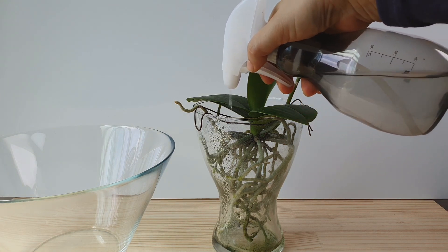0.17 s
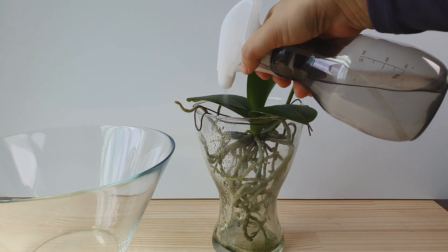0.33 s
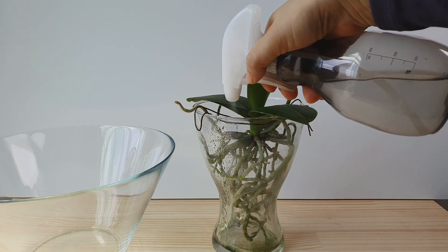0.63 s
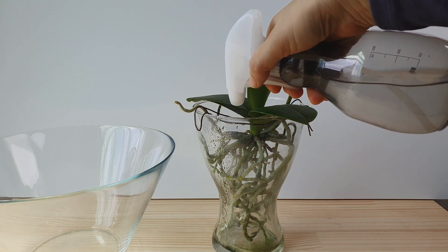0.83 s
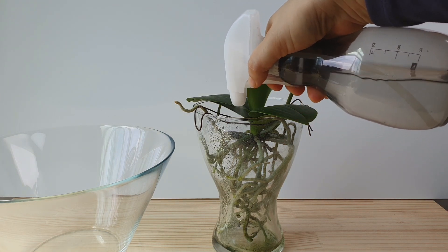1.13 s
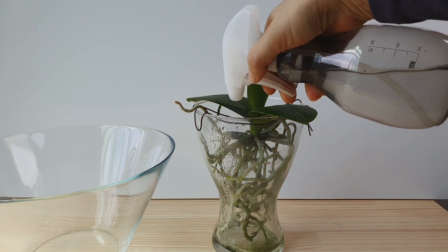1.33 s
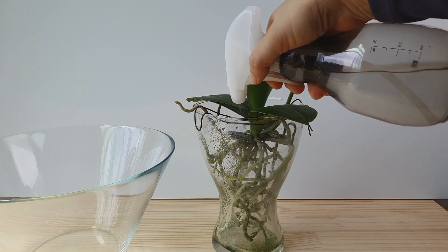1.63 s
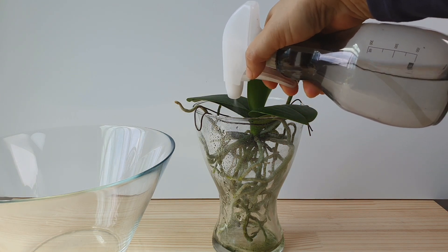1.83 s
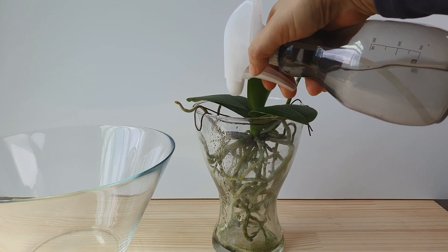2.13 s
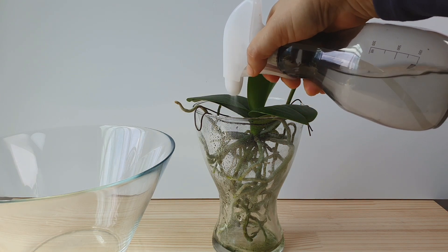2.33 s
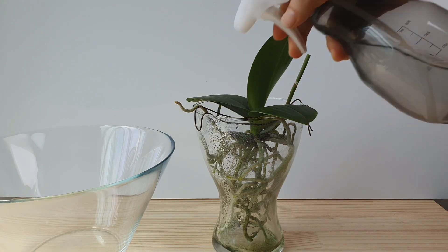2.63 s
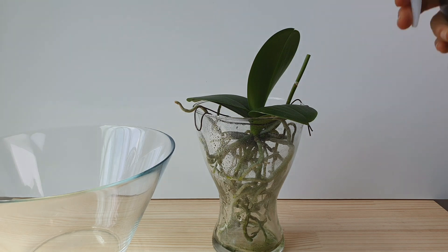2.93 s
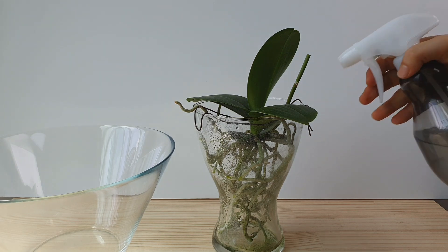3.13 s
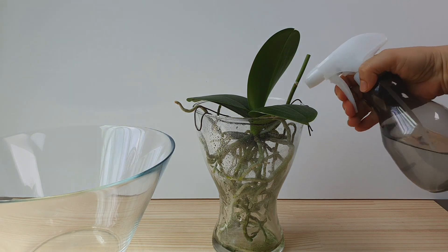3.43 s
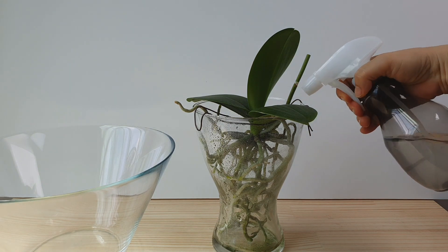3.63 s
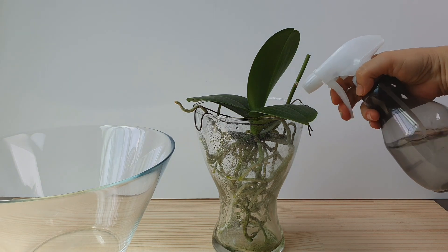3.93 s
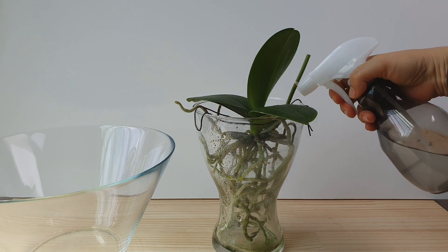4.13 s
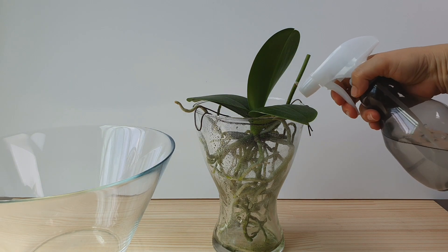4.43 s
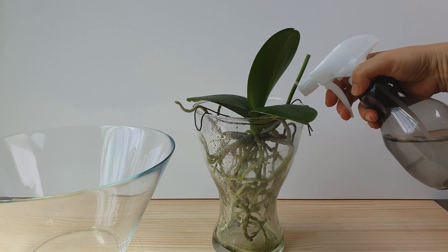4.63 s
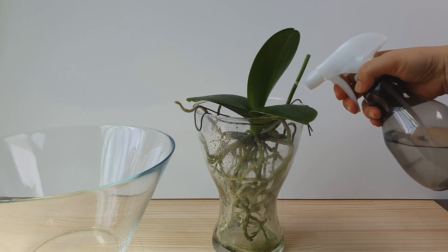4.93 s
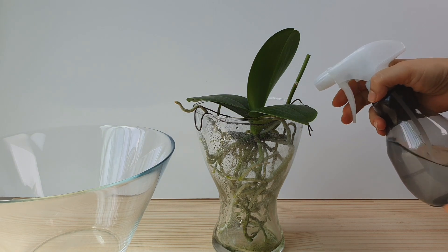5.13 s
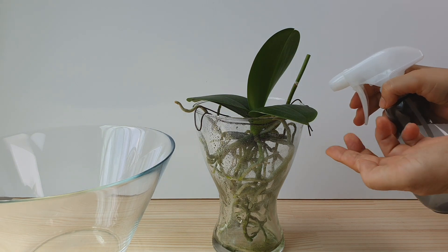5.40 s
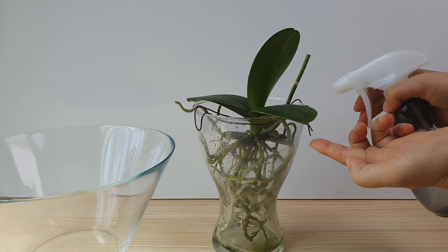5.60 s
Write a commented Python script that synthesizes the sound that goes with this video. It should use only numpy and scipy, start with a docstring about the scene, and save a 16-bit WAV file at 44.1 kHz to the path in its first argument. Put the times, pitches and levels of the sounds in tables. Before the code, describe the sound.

A plastic trigger spray bottle mists a plant in five short, hissing squirts, with small creaks and ticks in a quiet room.

```python
"""A plastic trigger bottle mists a potted plant in a small, bare room, close to a mono microphone.
A low hum lies underneath from the start, and first the trigger creaks back from an earlier squeeze.
Five strokes follow. In each, the trigger creaks as it is squeezed, then the nozzle hisses and the
mist patters on the leaves. Next the spring pushes the trigger back with another creak while the pump
gulps water. Most strokes end with a small tick as the trigger reaches its stop."""
import sys
import numpy as np
from scipy import signal
from scipy.fft import rfft, irfft
from scipy.io import wavfile

SR = 44100
rng = np.random.default_rng(int(sys.argv[2]) if len(sys.argv) > 2 else 0)


def waveform_to_disk(signal):
    """Save audio, clipped to [-1, 1], as 16-bit WAV at the path in sys.argv[1]."""
    frames = np.transpose(np.atleast_2d(signal))
    scaled = np.clip(frames, -1, 1) * 32767
    samples = np.round(scaled).astype(np.int16)
    wavfile.write(sys.argv[1], SR, samples)


N = 254100
TIME = np.arange(N) / SR


def from_db(db):
    """Turn decibels into a gain to multiply by."""
    return 10 ** (np.asarray(db) / 20)


def rms_one(x):
    """Scale a signal so that its average strength (rms) is 1."""
    return x / np.sqrt(np.mean(x ** 2) + 1e-20)


def at_hz(points, hz, column=1):
    """Read a table between its rows, with every octave equally wide."""
    table = np.array(points)
    return np.interp(np.log(np.maximum(hz, 1)), np.log(table[:, 0]), table[:, column])


def drift(rate_hz):
    """A random wobble of size 1, mostly slower than rate_hz."""
    hz = np.arange(N // 2 + 1) * SR / N
    noise_spectrum = rfft(rng.standard_normal(N))
    return rms_one(irfft(noise_spectrum / (1 + (hz / rate_hz) ** 2) ** 2, N))


def colour(x, tone, size=8192):
    """Give x a tone colour. The table sets only the balance of low and high, not the loudness."""
    hz = np.arange(size // 2 + 1) * SR / size
    cepstrum = irfft(np.log(from_db(at_hz(tone, hz))))
    # Folding the cepstrum makes the filter ring after a click, never before it.
    cepstrum[1:size // 2] *= 2
    cepstrum[size // 2 + 1:] = 0
    response = irfft(np.exp(rfft(cepstrum)))
    return signal.fftconvolve(x, response / np.linalg.norm(response))[:N]


def resonate(x, hz, width_hz):
    """Make x ring at one pitch; a narrower width rings longer."""
    decay = np.exp(-np.pi * width_hz / SR)
    return signal.lfilter([1, 0, -1], [1, -2 * decay * np.cos(2 * np.pi * hz / SR), decay * decay], x)


def droplets(per_s, spread_db):
    """Tiny impacts of uneven size at random moments."""
    sizes = from_db(spread_db * np.minimum(rng.exponential(1, N), 4))
    signs = rng.choice([-1, 1], N)
    hits = rng.random(N) < per_s / SR
    return rms_one(sizes * signs * hits)


# The slow rise and fall of the hum. Each row: time in seconds, level in dB.
HUM_LEVELS = [(0, -57), (.5, -57.5), (1.2, -63), (2.05, -57), (3.05, -55), (3.65, -61.5), (4.1, -64),
              (4.7, -55), (5.76, -56.5)]

def hum(pitch_hz=58.8, swell_db=3.5, waver_db=0.14, waver_rad=0.12):
    """A low, wavering tone that swells a little at the top of a spray."""
    times, levels = np.transpose(HUM_LEVELS)
    _, mist, _ = spray_gains()
    db = np.interp(TIME, times, levels) + swell_db * mist / mist.max() + waver_db * drift(12.6)
    phase = 2 * np.pi * pitch_hz * TIME + waver_rad * drift(5.4)
    return from_db(db) * np.sqrt(2) * np.sin(phase)


# The tone colours of the air and the rumble. Each row: frequency in Hz, relative level in dB.
AIR_TONE = [(50, -19.5), (80, -6), (130, -4.5), (220, -8), (330, -19.5), (600, -23.5), (1500, -29),
            (3500, -32.5), (5000, -37), (8000, -45), (10300, -39.5), (15000, -42)]
RUMBLE_TONE = [(15, -5.5), (38, -1), (55, 1), (80, -13.5), (200, -38.5), (1000, -81)]
# Faint low drones of the room. Each row: pitch in Hz, width in Hz, level in dB.
ROOM_DRONES = [(101.4, 1.9, -80), (124.8, 8, -83), (217, 6.2, -84.5), (292.3, 19, -87)]

def room_noise(air_db=-74.5, rumble_db=-64.0):
    """The quiet room: soft air noise, a deep rumble and faint drones."""
    air = from_db(air_db) * colour(rng.standard_normal(N), AIR_TONE)
    rumble = from_db(rumble_db) * colour(rng.standard_normal(N), RUMBLE_TONE)
    drones = sum(from_db(db) * rms_one(resonate(rng.standard_normal(N), hz, width_hz))
                 for hz, width_hz, db in ROOM_DRONES)
    return air + rumble + drones


# How the room echoes. Each row: frequency in Hz, seconds to fade by 60 dB,
# level of the echoes over the direct sound in dB.
ROOM_ECHOES = [(304, 0.59, 11), (2456, 0.32, 10), (5900, 0.35, 4), (10000, 0.3, 3), (16500, .22, 17.5)]

def room_echo(x, build_s=0.0056, first_echo_s=0.00043):
    """Echoes thicken for a moment, then die away, the treble first; overall power is kept."""
    t = TIME[:SR * 3 // 4]
    hz = np.arange(len(t) // 2 + 1) * SR / len(t)
    noise_spectrum = rfft(rng.standard_normal(len(t)))
    edges_hz = np.append(0, np.geomspace(400, SR / 2, 14))
    build = 1 - np.exp(-np.maximum(t - first_echo_s, 0) / build_s)
    tail = 0
    for low, high in zip(edges_hz, edges_hz[1:]):
        band = irfft(noise_spectrum * (hz >= low) * (hz < high), len(t))
        fade = build * from_db(-60 * t / at_hz(ROOM_ECHOES, (low + high) / 2))
        tail = tail + band * fade / np.linalg.norm(fade)
    echo_gain = from_db(at_hz(ROOM_ECHOES, hz, column=2))
    response = irfft((1 + echo_gain * rfft(tail)) / np.sqrt(1 + echo_gain ** 2), len(t))
    return signal.fftconvolve(x, response[:len(t) * 9 // 10])[:N]


# Water refills the pump in gulps, and surges into the nozzle as some sprays start.
# Each row: start in seconds, length in seconds, level in dB.
PUMP_GULPS = [(0.113, 0.025, -60), (0.712, .043, -65.5), (0.785, 0.049, -64), (0.862, 0.033, -69),
              (1.903, 0.024, -61.5), (3.374, 0.023, -65.5), (4.753, 0.018, -64), (4.835, 0.054, -66.5),
              (5.385, 0.14, -71.5)]
NOZZLE_SURGES = [(1.41, 0.021, -63), (2.897, 0.099, -60), (4.388, 0.022, -71)]
# How the pump chamber and the nozzle channel ring. Each row: pitch in Hz, width in Hz, added level in dB.
PUMP_RINGS = [(1430, 190, -3.5), (2750, 840, 1)]
NOZZLE_RINGS = [(610, 300, -2.5), (1026, 323, 2)]
# Short squeaks, scrapes and a knock from the trigger and spray head.
# Each row: start in seconds, length in seconds, pitch in Hz, width in Hz, level in dB.
SPRAY_HEAD_NOISES = [(0.012, 0.042, 1820, 348, -58.5), (.748, .03, 3900, 2100, -60.5),
                     (1.243, .075, 2130, 517, -73.5), (1.313, .082, 2420, 600, -68.5),
                     (3.237, 0.015, 2500, 600, -61), (4.317, .037, 2480, 700, -77),
                     (5.532, 0.017, 2680, 800, -59)]

def gurgles_and_squeaks(fade_db=9, ring_s=0.015):
    """Fading bursts of tiny impacts ring: bubbles in the pump and nozzle, and the spray head's noises."""
    bursts = []
    for gulps, rings in ((PUMP_GULPS, PUMP_RINGS), (NOZZLE_SURGES, NOZZLE_RINGS)):
        for start_s, length_s, db in gulps:
            bursts += [(start_s, length_s, hz, width_hz, db + ring_db) for hz, width_hz, ring_db in rings]
    sound = np.zeros(N)
    impacts = droplets(per_s=2000, spread_db=0.0)
    for start_s, length_s, hz, width_hz, db in bursts + SPRAY_HEAD_NOISES:
        start, size = int(start_s * SR), int(length_s * SR)
        burst = impacts[start:start + size] * from_db(np.linspace(0, -fade_db, size))
        burst = np.pad(burst, (0, int(ring_s * SR)))   # leave time to ring out
        ringing = resonate(resonate(burst, hz, width_hz), hz, width_hz)
        gain = from_db(db) * np.sqrt(size / len(ringing))
        sound[start:start + len(ringing)] += gain * rms_one(ringing)
    return sound


# The trigger ticks home. Each row: time in seconds, level in dB before the boost.
TICK_HITS = [(1.2575, -66), (2.221, -63.5), (4.065, -60.5), (5.5322, -65)]
# The tone colour of a tick. Each row: frequency in Hz, relative level in dB.
TICK_TONE = [(400, -27), (1700, -33), (2150, -1.5), (2600, -2), (3600, -5.5), (4100, -12.5), (6500, -16),
             (8200, -34), (9100, -13.5), (10100, 2), (11000, -2.5), (12500, -17.5), (16000, -29)]

def ticks(boost_db=29, bounce_s=0.022, bounce_db=-1.5):
    """The trigger meets its stop and bounces once."""
    clicks = np.zeros(N)
    for time_s, db in TICK_HITS:
        clicks[int(time_s * SR)] += from_db(db + boost_db)
        clicks[int((time_s + bounce_s) * SR)] += from_db(db + boost_db + bounce_db)
    return colour(clicks, TICK_TONE)


def creaks(runs, tone, slips_per_s, jitter, uneven_db=2.5, max_slips=24):
    """Plastic sticks and slips: short, nearly regular runs of clicks ring in the spray head."""
    clicks = np.zeros(N)
    for start_s, length_s, db, swell_db in runs:
        gaps_s = np.exp(jitter * rng.standard_normal(max_slips)) / slips_per_s
        after_s = np.cumsum(gaps_s) - gaps_s[0]
        slip_db = db + swell_db * after_s / length_s + uneven_db * rng.standard_normal(max_slips)
        sizes = from_db(slip_db) * np.sqrt(SR / slips_per_s)
        inside = after_s < length_s
        clicks[((start_s + after_s[inside]) * SR).astype(int)] += sizes[inside]
    return colour(clicks, tone)


# The trigger is let go. Each row: start in seconds, length in seconds, starting level in dB,
# change over the creak in dB.
RELEASE_CREAKS = [(.003, .069, -60, -13), (0.102, 0.029, -60, 12.5), (0.748, 0.037, -59.5, -7),
                  (0.79, 0.023, -49.5, -19), (1.849, 0.037, -55, -13), (3.287, 0.044, -57, -5),
                  (4.764, 0.041, -52, -10), (5.382, .028, -51.5, -4)]
# The tone colour of these creaks. Each row: frequency in Hz, relative level in dB.
RELEASE_TONE = [(300, -16.5), (850, -6.5), (1100, -8.5), (1450, 0), (2000, -2), (3100, 2.5), (4100, -5),
                (5700, -8), (8000, -18.5), (9200, -2.5), (10300, 2), (12500, -14.5), (16000, -28)]

def releases(slide_s=0.069, slide_db=-12.5, slide_fade_db=-10.5):
    """The spring pushes the trigger back: a creak, then a softer, fading slide."""
    slides = [(start_s + length_s, slide_s, db + slide_db, slide_fade_db)
              for start_s, length_s, db, _ in RELEASE_CREAKS]
    return creaks(RELEASE_CREAKS + slides, RELEASE_TONE, slips_per_s=145, jitter=0.2)


# The trigger is squeezed. Each row: start in seconds, length in seconds, starting level in dB,
# change over the creak in dB.
SQUEEZE_CREAKS = [(.177, 0.018, -61, -6), (0.22, 0.018, -51, 0.5), (1.382, .022, -55, 10.5),
                  (2.860, 0.033, -57.5, 10.5), (4.356, 0.026, -57.5, 11), (4.975, .033, -56.5, 8.5)]
# The tone colour of these creaks. Each row: frequency in Hz, relative level in dB.
SQUEEZE_TONE = [(300, -28.5), (900, -20), (1350, -27.5), (1700, -12.5), (1900, -24), (2100, -4), (2600, -2),
                (3500, -8.5), (4000, -21.5), (5150, -19), (7900, -32), (10100, -7.5), (12500, -31),
                (16000, -37)]

def squeezes():
    """The trigger creaks as the finger presses."""
    return creaks(SQUEEZE_CREAKS, SQUEEZE_TONE, slips_per_s=175, jitter=0.12)


# The pushes on the trigger; the first is already dying away at time zero. Each row: start in seconds,
# seconds to build, seconds held, relative level at the top in dB, swell while it builds in dB.
PUSHES = [(-.2, 0.12, 0.024, -49, 15), (0.254, 0.27, 0.054, -50, 48.5), (1.41, .19, 0.052, -49.5, 25),
          (2.894, 0.19, 0.045, -49, 13), (4.387, 0.16, 0.054, -48.5, 31), (5.01, 0.2, 0.022, -51.5, 30)]
# The nozzle spits air with the water and hisses brighter.
# Each row: time of the top in seconds, seconds to rise, seconds held, level in dB.
NOZZLE_SPITS = [(0.511, .004, 0.0088, -43.5), (1.442, 0.025, .005, -50.5), (1.733, .005, 0.0054, -55.5),
                (2.929, .018, 0.024, -42.5), (3.067, 0.03, 0.046, -31), (4.438, 0.0018, 0.0051, -37.5),
                (4.574, 0.021, 0.029, -34), (5.059, 0.0059, .026, -42)]

def spray_gains(swell_bend=1.81, patter_db=-6, patter_swell_share=0.71, hiss_over_mist_db=7.5,
                spit_rise_db=17, spit_in_mist_db=-21):
    """Patter, mist and hiss all follow the push; spits add to the hiss and a little to the mist."""
    open_db_per_s = 3500
    mist_fall_db_per_s, patter_fall_db_per_s, spit_fall_db_per_s = 171, 139.5, 196
    patter, mist, spits = np.zeros((3, N))
    for start_s, build_s, hold_s, db, swell_db in PUSHES:
        open_db = db - open_db_per_s * np.maximum(start_s - TIME, 0)
        # The push levels off towards its top, is held, then dies away.
        below_top_db = swell_db * np.clip(1 - (TIME - start_s) / build_s, 0, 1) ** swell_bend
        since_end_s = np.maximum(TIME - start_s - build_s - hold_s, 0)
        mist += from_db(open_db - below_top_db - mist_fall_db_per_s * since_end_s)
        patter_drop_db = patter_swell_share * below_top_db + patter_fall_db_per_s * since_end_s
        patter += from_db(open_db + patter_db - patter_drop_db)
    for top_s, rise_s, hold_s, db in NOZZLE_SPITS:
        below_top_db = spit_rise_db * np.maximum(top_s - TIME, 0) / rise_s
        since_end_s = np.maximum(TIME - top_s - hold_s, 0)
        spits += from_db(db - below_top_db - spit_fall_db_per_s * since_end_s)
    hiss = np.hypot(from_db(hiss_over_mist_db) * mist, spits)   # hypot adds their powers
    return patter, np.hypot(mist, from_db(spit_in_mist_db) * spits), hiss


# The tone colours of drops on the leaves, the rushing mist and the hissing nozzle.
# Each row: frequency in Hz, relative level in dB.
PATTER_TONE = [(150, -39.5), (250, -13), (394, -14), (492, -11.5), (585, -15), (652, -2.5), (985, -4),
               (1800, -1), (2340, -25), (3960, -120)]
MIST_TONE = [(940, -31), (1600, -7), (2240, -4), (2360, -4.5), (2560, -1.5), (2760, -3), (3470, -0.5),
             (6360, -11.5), (8000, -21.5), (10400, -47), (17600, -120)]
HISS_TONE = [(4710, -35), (8000, -27.5), (9470, -6), (9580, -5), (10200, -1), (11000, -3), (13600, -11),
             (14900, -9.5), (15500, -24), (16000, -7.5)]

def spray(mist_db=2.5, flutter_db=0.62, full_sputter_at_db=-35):
    """The hissing jet breaks into droplets that patter on the leaves; under a hard push it sputters."""
    patter_gain, mist_gain, hiss_gain = spray_gains()
    flutter = from_db(flutter_db * drift(90))
    push = np.minimum(hiss_gain / from_db(full_sputter_at_db), 1)
    sputter = from_db(push * (drift(456) - 0.2))
    patter = patter_gain * colour(droplets(per_s=3000, spread_db=-1.0), PATTER_TONE)
    mist = from_db(mist_db) * mist_gain * colour(droplets(per_s=12000, spread_db=2.5), MIST_TONE)
    hiss = hiss_gain * colour(rng.standard_normal(N), HISS_TONE)
    return flutter * (patter + sputter * (mist + hiss))


def scene(echo_share=0.53):
    """Creaks, ticks and a share of the gurgles and squeaks echo in the room; both channels are alike."""
    small_noises = gurgles_and_squeaks()
    echoing = room_echo(squeezes() + releases() + ticks() + echo_share * small_noises)
    direct = spray() + (1 - echo_share) * small_noises
    mono = echoing + direct + hum() + room_noise()
    return np.array([mono, mono])


def record(dry, cutoff_hz=15600):
    """The highest treble is cut off steeply."""
    return signal.sosfilt(signal.ellip(12, 0.1, 80, cutoff_hz, fs=SR, output="sos"), dry)


dry = scene()
out = record(dry)
waveform_to_disk(out)
```